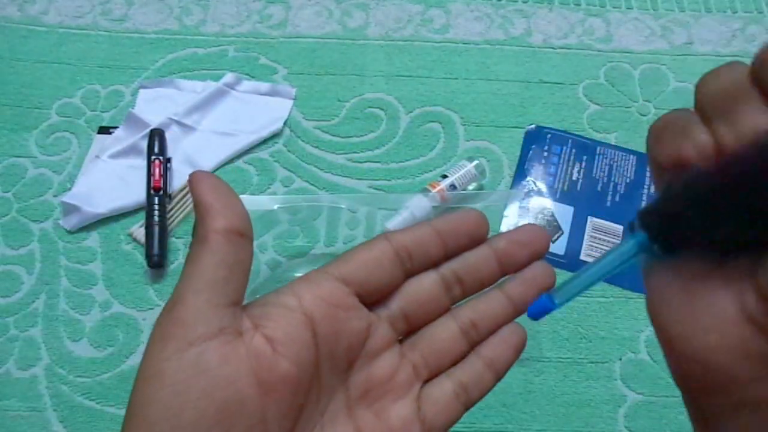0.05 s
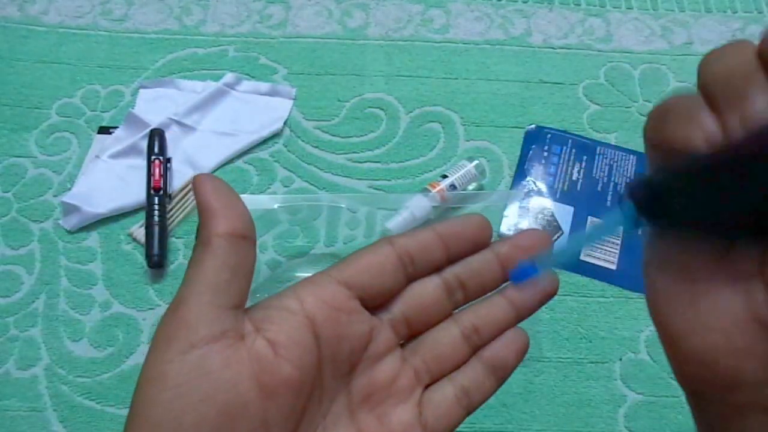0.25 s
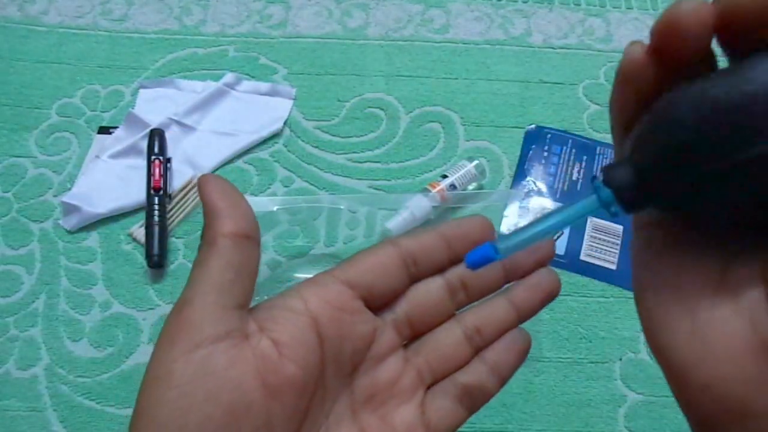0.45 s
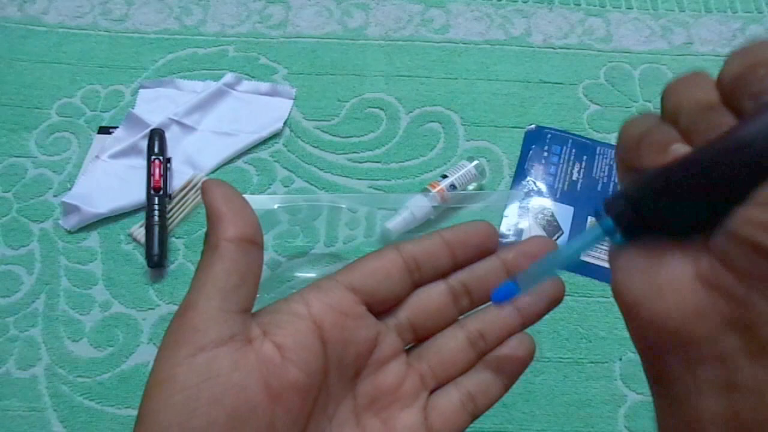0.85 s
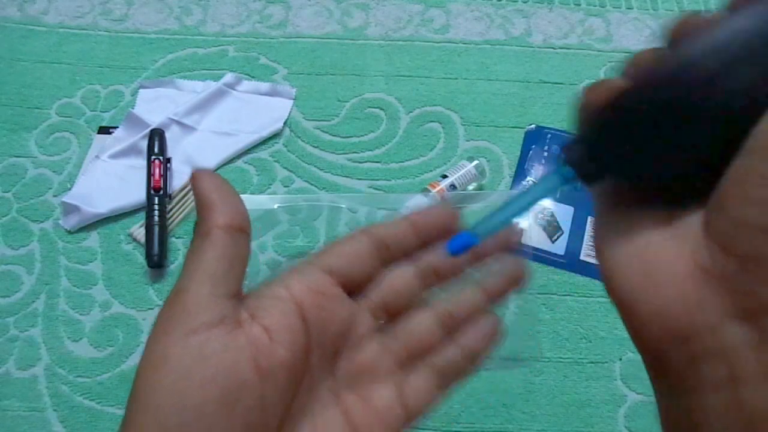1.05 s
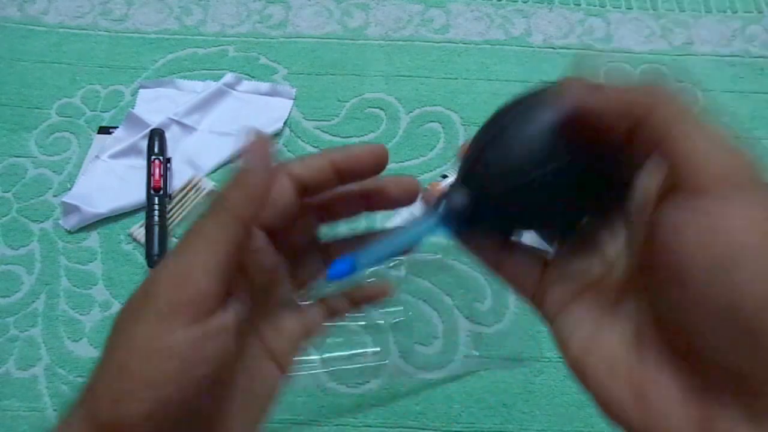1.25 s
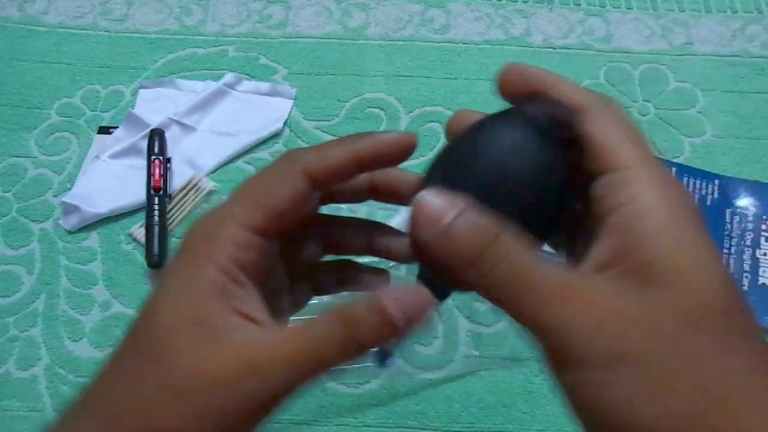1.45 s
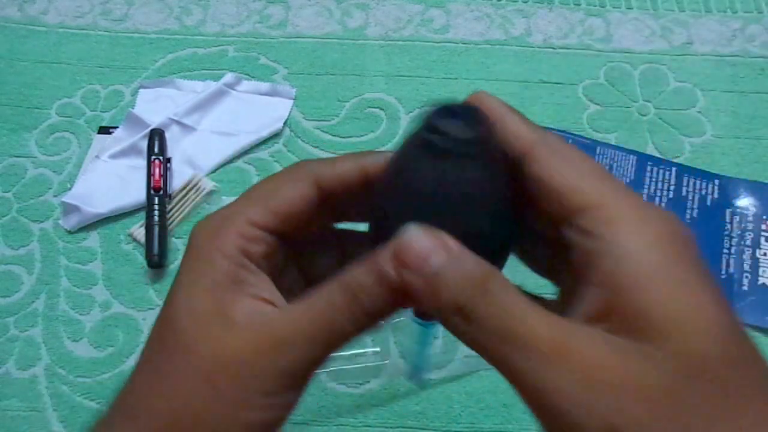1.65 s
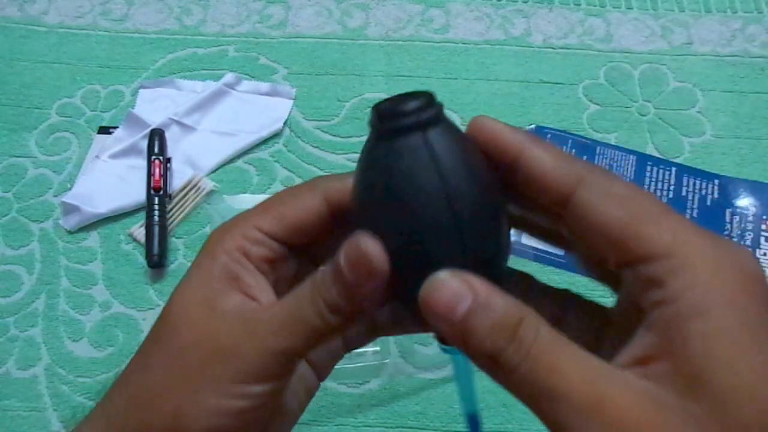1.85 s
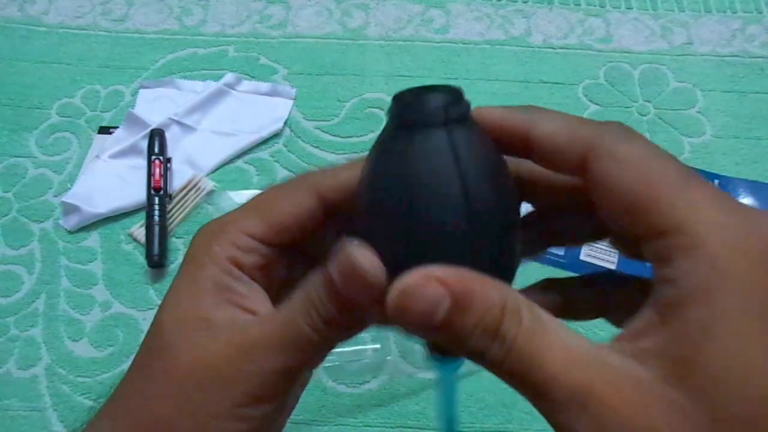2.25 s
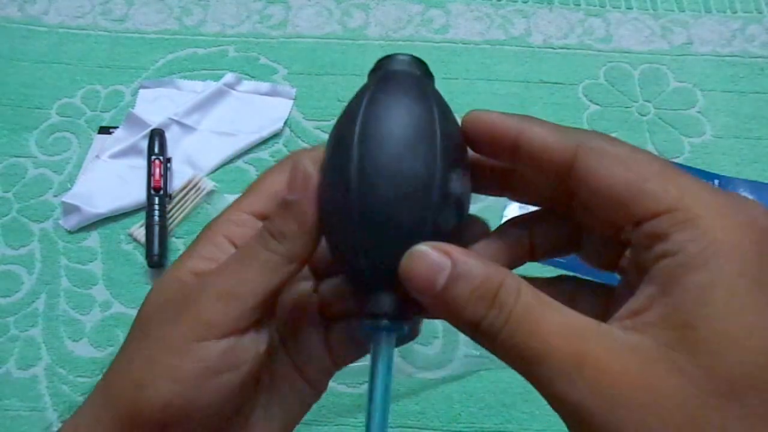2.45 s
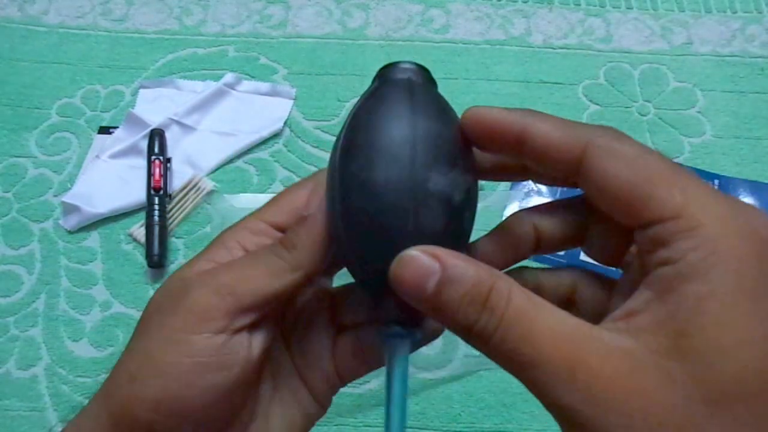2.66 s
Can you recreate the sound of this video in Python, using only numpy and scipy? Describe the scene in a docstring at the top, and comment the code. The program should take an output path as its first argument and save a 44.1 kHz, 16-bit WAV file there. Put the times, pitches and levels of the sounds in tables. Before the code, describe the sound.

A rubber air blower puffs against a palm at the start and again at about 0.7 seconds. After each puff it draws air back with a thin, faintly whistling hiss, popping softly into shape near 0.5 and 1.3 seconds. Close, dull finger bumps and rubs come throughout, thickest around 1.5 seconds, then lighter until about 2.6 seconds. Low, steady room noise and a faint high whine lie underneath.

```python
"""A jet of air hisses against an open palm: a rubber blower, squeezed twice in a quiet room.
On each release the bulb sucks air through its thinly whistling valve and pops back into shape.
Fingers rub and bump the rubber close to the microphone, then turn the blower over.
Steady room noise and a faint electrical whine lie underneath."""
import sys
import numpy as np
from scipy import signal
from scipy.fft import rfft, irfft
from scipy.io import wavfile

SR = 44100
rng = np.random.default_rng(int(sys.argv[2]) if len(sys.argv) > 2 else 0)


def put_to_file(sound):
    """Save the sound as 16-bit audio at rate SR, in the file named by the first command-line argument."""
    columns = np.atleast_2d(sound).T  # one column per channel
    safe = np.clip(columns, -1, 1)
    whole_steps = np.round(safe * 32767)
    wavfile.write(sys.argv[1], SR, whole_steps.astype(np.int16))


N = 119070
TIME_S = np.arange(N) / SR

# outflow, one list per squeeze: (time [s], jet level [dB], palm level [dB])
SQUEEZE_STROKES = [
    [(0.0, -62, -64), (0.018, -53, -51), (0.026, -48, -54), (0.03, -45, -52.5), (0.096, -34.5, -25),
     (0.16, -36.5, -29.5), (0.215, -49, -44.5)],
    [(0.7, -61, -53), (0.748, -41.5, -61), (0.774, -38, -37.5), (0.834, -35.5, -30.5), (0.884, -37.5, -30),
     (0.91, -39, -34.5), (0.942, -49, -53), (0.96, -54, -56)],
]
# nozzle hiss, its sharp edge, rush on the palm: (frequency [Hz], density [dB])
JET_SPECTRUM = [(500, -12), (2000, 1), (4000, 2), (5600, 2), (7500, 2.5), (10000, 7.5), (11200, 6.5),
                (12200, 2.5), (13500, 8.5), (15000, -1)]
EDGE_SPECTRUM = [(2000, -30), (4000, -8), (5600, 5), (7000, -1), (9000, -20)]
PALM_SPECTRUM = [(300, -13), (700, -6), (1150, -1), (1500, 1.5), (1750, -2.5), (2150, 0), (2700, -3.5),
                 (3700, -9.5), (4700, -11), (7000, -18.5), (15000, -36)]
# shift of the rush by the spot each jet hits: (frequency factor [ratio])
PALM_SHIFTS = [1.21, 0.86]
# grip changes: (start [s], length [s], level [dB])
GRIP_RUBS = [(0, 0.3, -37.5), (.3, 0.26, -37.5), (0.477, 0.11, -39), (0.609, 0.094, -38.5),
             (0.736, .1, -35.5), (.84, 0.069, -42), (1.177, 0.22, -45), (1.363, 0.13, -32),
             (1.5, 0.15, -37), (1.715, 0.17, -31.5), (1.917, 0.23, -35.5), (2.123, 0.32, -42),
             (2.356, 0.093, -32), (2.515, 0.11, -46)]
# room noise: (frequency [Hz], density [dB])
ROOM_SPECTRUM = [(25, -26), (60, -9), (170, -1.5), (280, -3), (400, -0.5), (560, -4.5), (680, -2.5),
                 (760, 2), (900, -2.5), (1050, -4), (1190, -0.5), (1410, -6.5), (1750, -7), (2400, -13.5),
                 (3200, -17), (5000, -26.5), (7000, -31.5), (11000, -35.5), (15000, -39)]
# flow reversals: (start [s], length [s], level [dB], start pitch [Hz])
VALVE_CHIRPS = [(.008, .014, -40, 12700), (0.223, 0.019, -31, 12800), (0.718, .018, -40, 12900),
                (0.964, 0.016, -45, 13050)]
# hand contacts: (crest time [s], peak [dB], pitch [Hz], length [s])
HAND_BUMPS = [(0.1629, -5.5, 257, 0.0065), (0.1662, 3, 390, 0.0026), (.195, -12, 350, 0.0028),
              (0.2086, -16, 260, 0.0047), (0.2188, -14, 290, 0.0039), (.264, -19.5, 278, 0.0044),
              (.308, -1, 288, 0.0044), (0.3148, -11.5, 354, 0.0044), (.3385, -23, 290, .005),
              (0.4227, -2, 308, 0.0032), (.4335, -22, 357, .005), (0.546, -31, 139, 0.015),
              (0.65, -24, 126, 0.024), (0.6716, -19.5, 205, 0.0045), (0.802, -19, 276, 0.0072),
              (0.8073, -16.5, 400, 0.0025), (0.916, -21, 196, 0.0062), (1.245, -20, 187, .007),
              (1.3576, -23, 210, .006), (1.392, -15, 300, 0.0023), (1.400, -16, 407, 0.0084),
              (1.4285, -18, 438, 0.0025), (1.4362, -8, 510, 0.0025), (1.4443, -10, 505, 0.0053),
              (1.448, -2, 313, 0.0062), (1.4905, -14, 220, 0.0073), (1.4953, -6, 345, 0.0036),
              (1.5005, -3.5, 367, 0.006), (1.5244, -11.5, 177, 0.0096), (1.529, -10.5, 240, 0.0044),
              (1.5348, -13, 230, 0.013), (1.5473, -10.5, 352, 0.0037), (1.5509, -12, 215, 0.0031),
              (1.558, -6.5, 280, .006), (1.7835, -19.5, 298, 0.0046), (1.8015, -18, 256, 0.0061),
              (1.8127, -20, 292, 0.0059), (1.849, -18.5, 318, 0.0038), (1.9637, -15, 325, 0.005),
              (1.971, -17, 184, 0.0066), (2.0095, -15.5, 210, 0.0077), (2.0364, -19.5, 218, .007),
              (2.0663, -15, 338, 0.0037), (2.2482, -9.5, 200, 0.0075), (2.2605, -10, 243, 0.0058),
              (2.3635, -14.5, 238, 0.0052), (2.3794, -18, 166, 0.0099), (2.4002, -13.5, 214, 0.0057),
              (2.407, -17.5, 139, 0.011), (2.4264, -17.5, 105, 0.016), (2.447, -25, 122, .012),
              (2.623, -30.5, 145, 0.012)]
# hand push, rubber body, knock: (pitch multiple [ratio], relative level [dB])
BUMP_PARTIALS = [(.4, -10.5), (1, 1.5), (1.9, -22)]
# inflow, one list per refill: (time [s], hiss level [dB], sizzle level [dB])
REFILL_STROKES = [
    [(0.22, -50, -44), (0.232, -41.5, -43), (0.252, -37, -37), (0.29, -31.5, -33), (0.336, -41.5, -47),
     (0.438, -45.5, -38), (0.474, -42.5, -45), (0.512, -34, -32), (0.538, -43.5, -59), (0.612, -56, -69),
     (0.66, -62, -69)],
    [(0.965, -51, -56), (0.975, -47.5, -37), (1.005, -37, -49), (1.047, -32.5, -45), (1.089, -40.5, -47),
     (1.149, -46.5, -36.5), (1.263, -43, -45), (1.297, -33, -42), (1.315, -42.5, -49), (1.389, -55, -73),
     (1.41, -66, -69)],
]
# intake hiss: (frequency [Hz], density [dB])
INTAKE_SPECTRUM = [(800, -13), (2500, -1.5), (5000, -2), (6500, -2), (7500, 0), (8100, 2), (9200, 2),
                   (9900, 0.5), (11000, 3.5), (12300, 0.5), (13500, -1), (15000, -11)]
# air path, mostly short-tube overtones: (frequency [Hz], width [Hz], relative level [dB])
VALVE_MODES = [(2750, 440, -10), (5330, 600, -8.5), (8020, 380, -1.5), (9000, 650, -17), (11000, 750, -4),
               (13500, 1000, 7), (14650, 650, 2)]
# tones of slow intake: (start [s], length [s], level [dB], pitch [Hz])
VALVE_WHISTLES = [(0.43, 0.023, -47, 8100), (1.12, .07, -43, 13900), (1.166, 0.13, -48.5, 8050)]
# bulb regaining its shape: (time [s], ring level [dB], tick level [dB])
BULB_POPS = [(0.5124, -12.5, -24), (1.2964, -18.5, -24)]
# rubber wall resonances: (frequency [Hz], relative level [dB], T60 [s])
BULB_MODES = [(650, -12, 0.011), (1000, 0.5, 0.01)]


def from_db(db):
    """Decibels to gain."""
    return 10 ** (np.asarray(db) / 20)


def unit_rms(x):
    """Scale to unit rms."""
    return x / np.sqrt(np.mean(x ** 2) + 1e-20)


def noise(spectrum):
    """Unit-rms noise of the given colour."""
    hz, db = np.transpose(spectrum)
    bins_hz = np.fft.rfftfreq(N, 1 / SR) + 1
    colour = from_db(np.interp(np.log(bins_hz), np.log(hz), db))
    return unit_rms(irfft(rfft(rng.standard_normal(N)) * colour, N))


def drift(rate_hz):
    """Unit-rms random wander."""
    lowpass = signal.butter(2, rate_hz, fs=SR, output="sos")
    return unit_rms(signal.sosfilt(lowpass, rng.standard_normal(N + SR))[SR:])


def air_tone(hz, width_hz):
    """Air-driven resonance, unsteady in strength and phase."""
    phase = 2 * np.pi * np.cumsum(hz * np.ones(N)) / SR
    return unit_rms(drift(width_hz / 2) * np.cos(phase) + drift(width_hz / 2) * np.sin(phase))


def swell(start_s, length_s):
    """Rounded rise and fall."""
    return np.sqrt(np.abs(np.sin(np.pi * np.clip((TIME_S - start_s) / length_s, 0, 1))))


def flow(strokes, column, fade_db_per_s=500):
    """Gain following one level column through each stroke, dying fast outside it."""
    gain = np.zeros(N)
    for rows in map(np.array, strokes):
        outside_s = np.abs(TIME_S - np.clip(TIME_S, rows[0, 0], rows[-1, 0]))
        gain += from_db(np.interp(TIME_S, rows[:, 0], rows[:, column]) - fade_db_per_s * outside_s)
    return gain


def nozzle_jet(gain_db=5, edge_db=-37, full_flow_db=-33, edge_exponent=2.4):
    """The nozzle hisses, sharper when pressed hard."""
    outflow = flow(SQUEEZE_STROKES, 1)
    hiss = from_db(gain_db) * outflow * noise(JET_SPECTRUM)
    edge_gain = from_db(edge_db) * (outflow / from_db(full_flow_db)) ** edge_exponent
    return hiss + edge_gain * noise(EDGE_SPECTRUM)


def palm_rush(gain_db=1, flutter_db=0.96, flutter_hz=56):
    """The jet flutters against the skin."""
    rush = np.zeros(N)
    for stroke, shift in zip(SQUEEZE_STROKES, PALM_SHIFTS):
        rush += flow([stroke], 2) * noise([(hz * shift, db) for hz, db in PALM_SPECTRUM])
    return from_db(gain_db + flutter_db * drift(flutter_hz)) * rush


def finger_rubs(slips_per_s=230, low_hz=59.4, high_hz=324):
    """Skin slips on rubber in small dull jerks."""
    slips = (rng.random(N) < slips_per_s / SR) * rng.standard_normal(N)
    dull = signal.sosfilt(signal.butter(2, high_hz, fs=SR, output="sos"), slips + 1e-18)
    dull = signal.sosfilt(signal.butter(1, low_hz, "high", fs=SR, output="sos"), dull)
    grip = sum(from_db(db) * swell(start_s, length_s) for start_s, length_s, db in GRIP_RUBS)
    return unit_rms(dull) * grip


def room(noise_db=-34, whine_db=-58, whine_hz=12258, wander_hz=14):
    """Steady background noise and a thin electrical whine."""
    background = from_db(noise_db) * noise(ROOM_SPECTRUM)
    phase = 2 * np.pi * np.cumsum(whine_hz + wander_hz * drift(30)) / SR
    return background + from_db(whine_db) * np.sin(phase)


def valve_chirps(sweep_hz_per_s=52000):
    """The valve chirps upward as the flow reverses."""
    out = np.zeros(N)
    for start_s, length_s, db, start_hz in VALVE_CHIRPS:
        hz = start_hz + sweep_hz_per_s * np.clip(TIME_S - start_s, 0, length_s)
        out += from_db(db) * swell(start_s, length_s) * air_tone(hz, width_hz=630)
    return out


def hand_bumps(steepness=3.57):
    """Each soft contact shakes the rubber for a cycle or two; pressure follows its speed."""
    out = np.zeros(N)
    for crest_s, peak_db, hz, length_s in HAND_BUMPS:
        near = np.abs(TIME_S - crest_s) < 4 * length_s
        offset_s = TIME_S[near] - crest_s
        shake = sum(from_db(db) * np.sin(2 * np.pi * multiple * hz * offset_s) / multiple
                    for multiple, db in BUMP_PARTIALS)
        speed = np.gradient(shake / np.cosh(steepness * offset_s / length_s))
        out[near] += from_db(peak_db) * speed / speed.max()
    return out


def intake_hiss(gain_db=2, full_flow_db=-31.5, exponent=1.09):
    """Air drawn back into the bulb hisses, growing slightly faster than the flow."""
    inflow = flow(REFILL_STROKES, 1) / from_db(full_flow_db)
    return from_db(gain_db + full_flow_db) * inflow ** exponent * noise(INTAKE_SPECTRUM)


def valve_sizzle(gain_db=-1, wander_hz=69.5):
    """Inflow excites the wandering resonances of the air path."""
    tube = sum(from_db(db) * air_tone(hz + wander_hz * drift(9.3), width_hz)
               for hz, width_hz, db in VALVE_MODES)
    return from_db(gain_db) * flow(REFILL_STROKES, 2) * unit_rms(tube)


def valve_whistles():
    """The valve whistles thinly while the intake is slow."""
    return sum(from_db(db) * swell(start_s, length_s) * air_tone(hz, width_hz=190)
               for start_s, length_s, db, hz in VALVE_WHISTLES)


def bulb_pops(tick_t60_s=0.021):
    """The full bulb snaps taut: a damped rubber ring and a tick of air."""
    out = np.zeros(N)
    for start_s, ring_db, tick_db in BULB_POPS:
        age_s = np.maximum(TIME_S - start_s, 0)
        fade = -np.log(1000) * age_s
        for hz, db, t60_s in BULB_MODES:
            out -= from_db(ring_db + db) * np.sin(2 * np.pi * hz * age_s) * np.exp(fade / t60_s)
        out += from_db(tick_db) * (age_s > 0) * np.exp(fade / tick_t60_s) * noise(INTAKE_SPECTRUM)
    return out


def scene():
    """One microphone feeds both channels."""
    squeezes = nozzle_jet() + palm_rush()
    valve = intake_hiss() + valve_sizzle() + valve_chirps() + valve_whistles()
    rubber = bulb_pops() + hand_bumps() + finger_rubs()
    mono = squeezes + valve + rubber + room()
    return np.array([mono, mono])


def record(dry, cutoff_hz=15200):
    """The loudest bump just clips; a steep low-pass cuts the top."""
    lowpass = signal.ellip(10, .05, 70, cutoff_hz, fs=SR, output="sos")
    return signal.sosfiltfilt(lowpass, np.clip(dry, -1, 1))


dry = scene()
out = record(dry)
put_to_file(out)
```